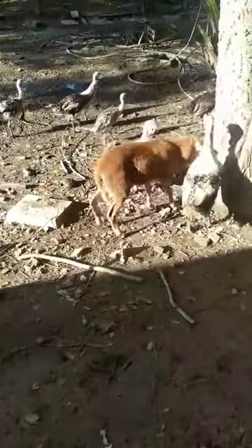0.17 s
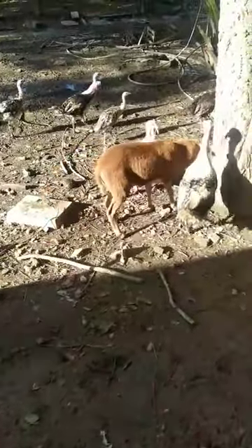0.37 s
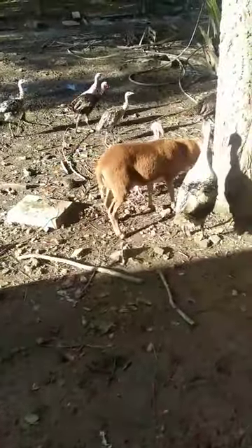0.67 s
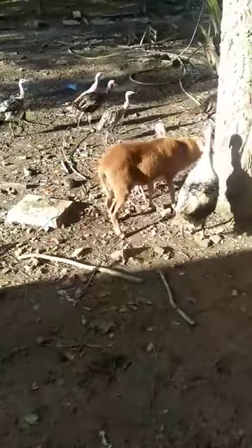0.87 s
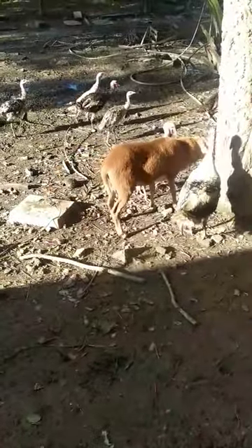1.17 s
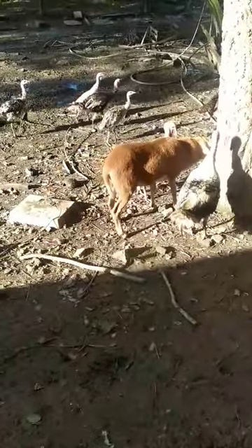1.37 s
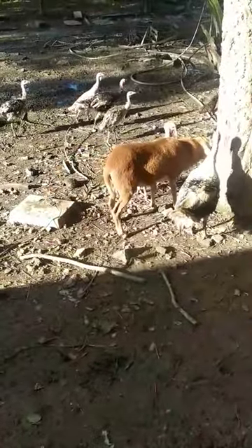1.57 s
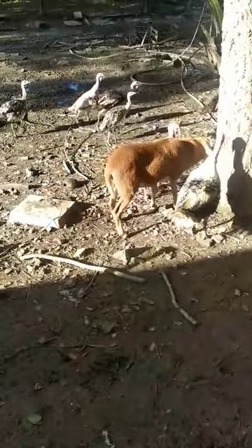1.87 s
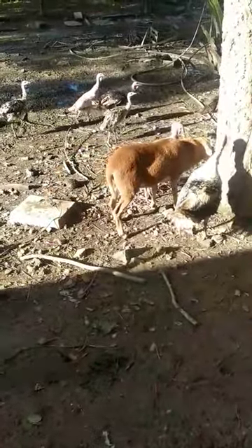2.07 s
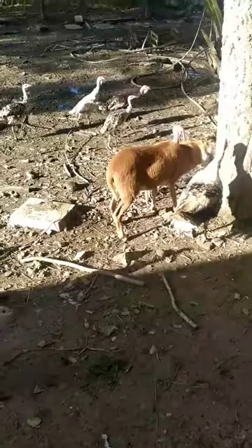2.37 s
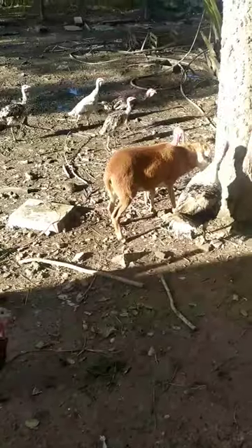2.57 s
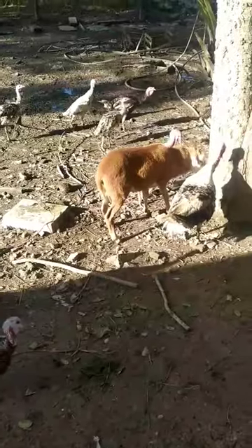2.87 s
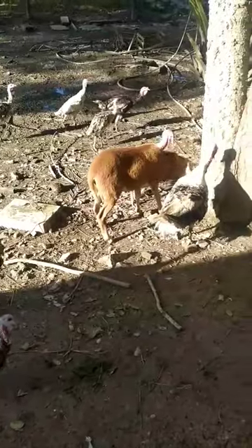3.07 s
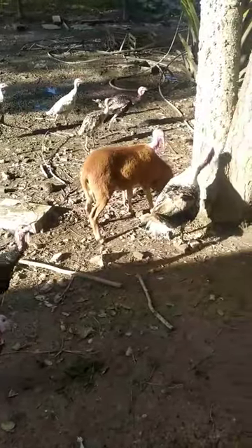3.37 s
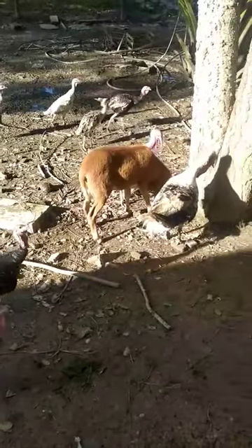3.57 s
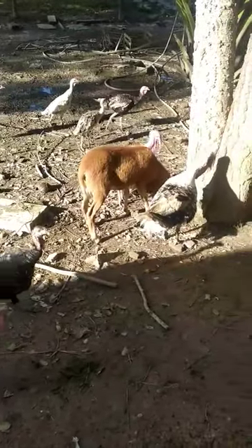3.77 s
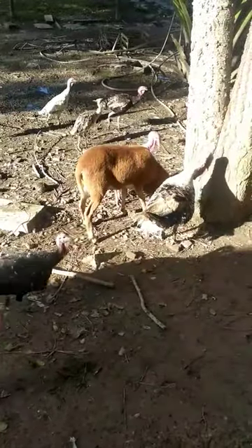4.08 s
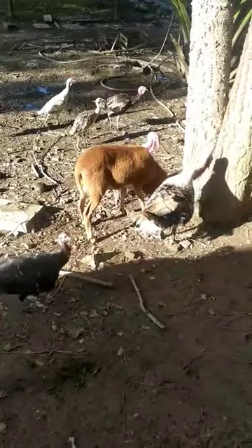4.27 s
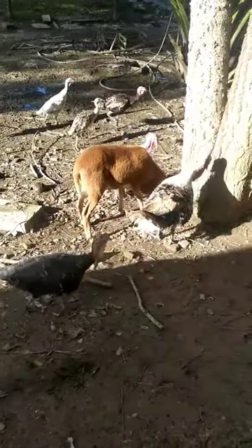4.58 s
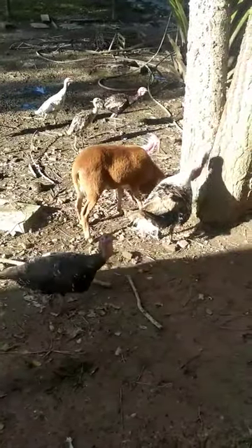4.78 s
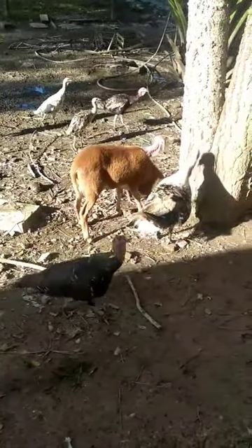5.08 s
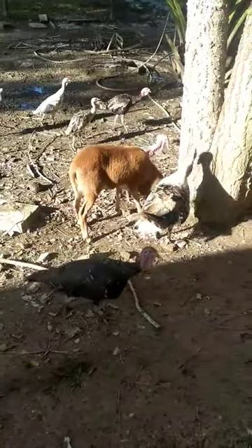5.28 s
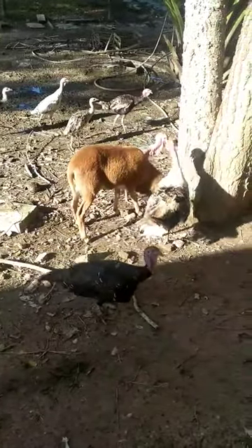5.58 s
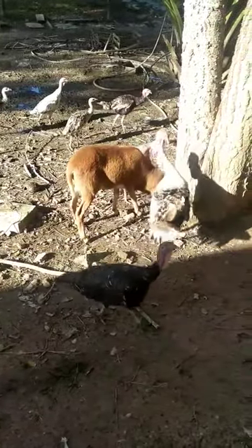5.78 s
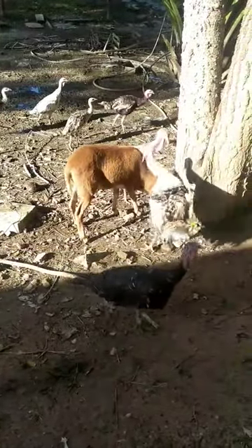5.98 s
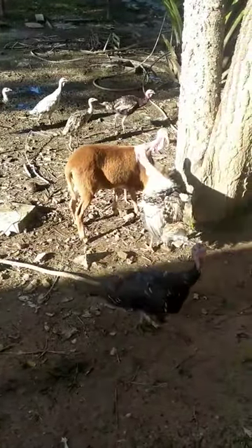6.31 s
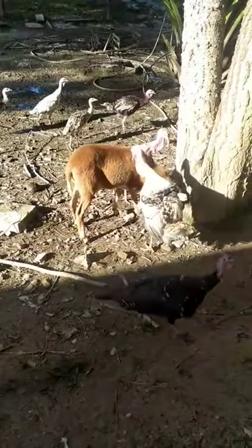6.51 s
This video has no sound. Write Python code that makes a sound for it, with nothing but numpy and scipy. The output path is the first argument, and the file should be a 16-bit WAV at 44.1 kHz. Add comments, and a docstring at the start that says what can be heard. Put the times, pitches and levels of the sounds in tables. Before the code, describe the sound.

Young turkeys give short, raspy, bent yelps and clucks in an open farmyard, with low wind buffeting, faint distant calls and one thin trill.

```python
"""Sharp yelps from nearby young turkeys come first, over a light wind and the hush of an open farmyard.
Each yelp is a quick gliding tone with a burst of raspy overtones; clucks and pips are shorter notes of the same kind.
Soft whistles, one thin trill and hoarse distant calls are wavering tones, some with breathy noise.
Dry litter crackles as shaped noise. Wind is low noise that buffets mostly the left port of the microphone."""
import sys
import numpy as np
from scipy import signal
from scipy.fft import rfft, irfft, next_fast_len
from scipy.io import wavfile
from scipy.ndimage import map_coordinates

SR = 44100
rng = np.random.default_rng(int(sys.argv[2]) if len(sys.argv) > 2 else 0)


def file_out(sig):
    """Save sig as 16-bit WAV at sys.argv[1]."""
    # one column per channel
    cols = np.atleast_2d(sig).T
    # limit, then scale
    lim = np.clip(cols, -1, 1)
    pcm = np.round(lim * 32767).astype(np.int16)
    wavfile.write(sys.argv[1], SR, pcm)


N = 293265

# Levels in the tables are starting levels, before balance between the ports, echo and other gains.
# Near yelps: start_s, length_s, pitch_hz, glide_octaves, level_db, rasp_db, left_lead_rad, left_over_right_db
YELPS = [(0, 0.017, 1120, -0.16, -39, -14, -1.27, 7.5), (0.086, 0.031, 946, 0.14, -36, -10.5, -0.45, 1.5),
         (0.222, 0.017, 1086, 0.42, -38.5, -3.5, 0.66, 17.5),
         (0.275, 0.022, 988, 0.71, -34.5, -14, -0.56, 10.5),
         (0.539, 0.031, 1010, 0.35, -48.5, -37, -0.63, 6),
         (0.576, 0.077, 912.4, -0.0067, -31, -21.5, -0.49, 6.5),
         (0.774, 0.04, 1002, 0.3, -31, -15, -1.4, 6), (0.85, 0.03, 954, 0.45, -30, -16, -0.26, 6),
         (1.333, 0.045, 910, -0.3, -35, -24, -0.73, 5), (1.381, 0.038, 950, 0.15, -36.5, -33.5, -1.3, 6),
         (1.53, 0.021, 1110, 0.52, -41.5, -18, -0.96, 7), (2.045, 0.021, 1010, 0.48, -51.5, -34, -0.84, 7),
         (2.218, 0.05, 834, 0.36, -50, -13, -0.74, 6), (2.903, 0.014, 948, -0.84, -40.5, -13, -0.17, 4.5),
         (3.547, 0.04, 898, -0.32, -48, -22, -0.019, 3), (3.577, 0.031, 678, 0.23, -42.5, -14.5, 0.6, 4),
         (3.602, 0.029, 912, 0.019, -43, -10, 0.031, 3), (3.869, 0.012, 887, 0.52, -36.5, -8, 0.54, 6),
         (3.934, 0.016, 728, 0.14, -33, -14, 0.099, 5), (4.159, 0.032, 688, 0.12, -37.5, -16, 0.36, 4),
         (4.259, 0.036, 1086, 0.35, -52, -3, -0.53, 7), (4.366, 0.019, 705, 0.25, -32.5, -12, 0.13, 4),
         (4.437, 0.018, 722, 0.23, -32, -13, 0.24, 5), (4.983, 0.027, 920, 0.7, -56, -10, -0.2, 7),
         (5.012, 0.05, 831, -0.0071, -42, -22, 0.47, 7.5), (5.158, 0.028, 850, 0.23, -43, -20, 0.71, 5),
         (5.263, 0.016, 884, 0.2, -36, -11, 0.39, 4), (5.332, 0.017, 835, 0.39, -39, -10, 0.24, 5),
         (5.61, 0.019, 714, 0.35, -44.5, -14, 0.55, 5), (5.658, 0.035, 871, -0.069, -45, -16.5, -0.28, -1),
         (5.759, 0.027, 914, 0.00026, -36, -18, -0.5, 2), (5.839, 0.024, 885, 0.16, -31.5, -22, -0.7, 5),
         (6.15, 0.024, 838, 0.34, -49, -32, 0.92, 10), (6.581, 0.034, 890, -0.36, -43, -22.5, 0.21, 6),
         (6.621, 0.037, 682, 0.56, -39, -17, 0.42, 3)]
# Clucks, low notes with an octave above: start_s, length_s, pitch_hz, level_db, octave_db, rasp_db
CLUCKS = [(0.165, 0.02, 682, -36.5, 6, -8), (0.332, 0.023, 672.5, -36.5, 6, -9),
          (0.919, 0.0138, 684.5, -34, 6, -13), (5.907, 0.0154, 686, -36.5, -8.5, -13)]
# Pips, tiny falling contact notes: start_s, pitch_hz, level_db
PIPS = [(1.596, 712, -54.5), (2.638, 1234, -52.5), (3.368, 768, -53.5), (3.908, 906, -51),
        (4.414, 907, -60), (5.38, 690, -49.5), (5.507, 750, -54)]
# Drawn-out whistles: start_s, length_s, pitch_hz, glide_octaves, level_db, huskiness_db
WHISTLES = [(1.411, 0.11, 896, -0.02, -46, -24), (2.26, 0.15, 899, 0.045, -56.5, -9),
            (2.662, 0.21, 858, -0.53, -61, -25), (3.131, 0.039, 801, 0.2, -45, -37),
            (3.196, 0.11, 897, 0.17, -59.5, -13), (3.642, 0.066, 899, -0.087, -49, -33),
            (3.734, 0.053, 1151, 0.21, -44.5, -12), (4.112, 0.03, 1110, 0.49, -51, -26),
            (4.265, 0.28, 1222, -0.28, -57, -23), (5.052, 0.06, 1209, 0.013, -51, -9),
            (5.199, 0.083, 1142, -0.055, -55.5, -16), (5.259, 0.19, 940, -0.0036, -47.5, -36),
            (5.683, 0.29, 946, 0.052, -58, -10), (6.166, 0.46, 1255, -0.014, -61, -31)]
# Distant calls: start_s, length_s, pitch_hz, glide_octaves, level_db, overtones_db, noise_share_0_to_1
FAR_CALLS = [(1.093, 0.33, 637, -0.025, -61, -20, .4), (1.586, 0.36, 590, -0.27, -65, -13, .4),
             (2.233, 0.43, 807, 0.03, -77.5, 12.5, 0.5), (2.66, 0.32, 799, -0.047, -64, 8, 0.68),
             (2.93, 0.28, 548, -.1, -58, 2.5, 0.94), (5.429, 0.18, 535, -0.108, -48, -10.5, 0.55),
             (5.882, 0.24, 538.7, -.12, -52, -7.5, 0.56), (6.15, 0.59, 611, 0.072, -67, -9, 0.1)]
# The course of the trill: time_s, pitch_hz, level_db, chirps_per_s
TRILL = [(2.22, 2870, -66.5, 52), (2.37, 3020, -60, 47), (2.52, 3003, -54, 49), (2.63, 2994, -53, 38),
         (2.72, 3046, -54.5, 44), (2.8, 3150, -53.5, 68), (2.84, 3255, -67, 42), (2.885, 3144, -41, 74),
         (2.91, 3014, -51, 59), (2.935, 3000, -72, 50)]
# Scratches in the dry litter: start_s, level_db, rise_s, fall_by_60_db_s
SCRATCHES = [(0.077, -44, 0.0022, 0.21), (0.146, -32, 0.015, 0.019), (0.167, -38.5, 0.0076, 0.43),
             (0.391, -49, 0.025, 0.23), (0.741, -37, 0.0049, 0.044), (0.753, -46, 0.0078, 0.13),
             (1.02, -52.5, 0.0042, 0.41), (2.839, -53, 0.041, 0.38), (3.597, -50.5, 0.013, 0.55),
             (3.762, -53.5, 0.018, 1)]
# Strength of the wind: time_s, buffet_db
WIND = [(0.0, -50), (1.15, -40), (1.52, -45.5), (1.57, -41.5), (1.67, -46), (1.85, -34), (1.97, -46),
        (2.26, -36), (2.35, -55.5), (2.44, -38.5), (4.36, -40), (4.64, -44.5), (5.86, -40), (6.65, -36)]
# Single gusts: start_s, peak_db
GUSTS = [(1.564, -23.5), (1.759, -24), (1.83, -29), (2.236, -28.5), (2.746, -20.5), (3.379, -25),
         (3.992, -30), (4.358, -25.5), (5.873, -22), (6.199, -23.5), (6.337, -27.5)]
# Strength of the yard's hush: time_s, hiss_db
HUSH = [(0.0, -53), (1.31, -59.5), (3.98, -56.5), (6.65, -57.5)]

# Colours of the noises, each later scaled to a set loudness: frequency_hz, level_db_per_hz
RUMBLE_COLOUR = [(13, -44), (22, -64), (44, 0), (70, 2.5), (177, -15.5), (362, -55.5), (420, -30),
                 (550, -49), (920, -120)]
EDDY_COLOUR = [(60, -5.5), (150, -3.5), (260, -12.5), (500, -37), (1200, -92)]
GUST_COLOUR = [(25, -40), (60, 1), (150, -6.5), (260, -17.5), (500, -63), (1200, -70)]
YARD_COLOUR = [(180, -46), (300, -2.5), (485, -6), (562, -2), (836, -4.5), (970, -7.5), (1310, -15.5),
               (1590, -17), (7920, -15.5), (15600, -25)]
LITTER_COLOUR = [(600, -5.5), (1500, 0.5), (4000, -9.5), (7000, 1), (10000, -6.5), (13500, -5.5),
                 (16000, -9)]
# How throats colour overtones and breath, near and far: frequency_hz, gain_db
THROAT = [(500, 14), (1100, 22), (1380, 18.5), (1650, 2), (2000, 18.5), (2500, 8), (3050, 18.5),
          (3500, 3.5), (3900, 11.5), (4700, 8), (5400, -3), (6300, 3), (9000, -2), (15000, -33)]
FAR_THROAT = [(500, 12), (900, 10), (1300, 4.5), (1700, 10.5), (2200, -2), (4000, -9)]
# How long the yard's echo lasts: frequency_hz, fall_by_60_db_s
ECHO = [(300, 0.98), (1000, 0.5), (3000, 0.85), (10000, 0.03)]

# A note opens fast, grows a little, closes just before its end and rings down
ATTACK_S, RELEASE_S, RING_S, CRESCENDO_DB = 0.0078, 0.0028, 0.0013, 1.5
SCOOP_OCT_PER_S = 3.27  # the longer a note, the deeper it sags in the middle
STRAIN_DB_PER_OCT = 12  # rasp rises with pitch within a note
RASP_AT_S, RASP_WIDTH_S = 0.015, 0.015  # the rasp is a burst soon after the start of a note
BREATHY = 0.4  # share of breath noise in the rasp's power
CRACKLE_HZ, CRACKLE_DB_PER_OCT = 4000, 10  # treble tilt of the rasp, by how far the note lies below 1000 Hz
# Nearby things scatter short waves most: the spray against the direct sound, for a note of 1000 Hz
NOTE_SCATTER_DB, RASP_SCATTER_DB, SCATTER_T60_S = -11, -0.5, 0.24
SCATTER_DB_PER_OCT = 2  # higher notes are scattered more
CLUCK_GLIDE_OCT, CLUCK_LEFT_DB, CLUCK_LEAD_RAD = 0.302, 4.5, -0.96  # every cluck jerks upward
PIP_S, PIP_GLIDE_OCT, PIP_RASP_DB = 0.014, -0.19, -17
GUST_RISE_S, GUST_T60_S = 0.0087, 0.12
GUST_RMS_DB = -7.5  # a gust's rms against its peak
FAR_ARCH_OCT = 0.0466  # a distant call rises in the middle
PEEP_FALL_S = 0.035  # a whistle drops in pitch as it ends
PEEP_DROP_OCT_PER_S2 = 3  # the drop grows with the square of the length
TRILL_MERGE_S = (2.69, 2.82)  # the chirps run together between these times
CHIRP_FALL = 0.036  # each separate chirp slides from this share above its pitch to this share below
UNDERTONE_HZ, UNDERTONE_DB = 1320, -5.5  # centre of the low pip between chirps, and its level against them
TOP_HZ = 15750  # nothing is kept from here up


def amp(db):
    """Decibels to gain."""
    return 10 ** (np.asarray(db) / 20)


def unit(x):
    """Scale to rms 1."""
    return x / np.sqrt(np.mean(x ** 2) + 1e-20)


def along(points, hz):
    """Read a table of (frequency, value) points on a log frequency axis."""
    f, v = np.transpose(points)
    return np.interp(np.log(hz + 1), np.log(f + 1), v)


def curves(rows):
    """One value per sample for each column after the time."""
    s, *cols = np.transpose(rows)
    return [np.interp(np.arange(N) / SR, s, c) for c in cols]


def wobble(rate, size=N):
    """A smooth random curve with rate knots a second."""
    return map_coordinates(rng.standard_normal(4096), [np.arange(size) * rate / SR], mode="wrap")


def filtered(x, response):
    """Change the strength of each frequency in x by a response."""
    size = x.shape[-1]
    m = next_fast_len(size + 8192)  # spare room so the end does not wrap onto the start
    return irfft(rfft(x, m) * response(np.fft.rfftfreq(m, 1 / SR)), m)[..., :size]


def noise(colour, size=N):
    """Two unrelated noises of the given colour, scaled together to rms 1."""
    return unit(filtered(rng.standard_normal((2, size)), lambda hz: amp(along(colour, hz))))


def balance(left_db):
    """Left and right gains, left_db apart."""
    return amp([[left_db / 2], [-left_db / 2]])


def ports(pair, alike, left_db):
    """Mix two unrelated signals into left and right with a given likeness and balance."""
    turn = np.arccos(np.clip(alike, -1, 1)) / 2
    mid, side = np.cos(turn) * pair[0], np.sin(turn) * pair[1]
    return np.array([mid + side, mid - side]) * balance(left_db)


def add(track, s, x):
    """Mix x into track at time s, dropping what falls outside."""
    start = round(s * SR)
    x = x[..., max(-start, 0):max(N - start, 0)]
    track[..., max(start, 0):max(start, 0) + x.shape[-1]] += x


def cycle(hz):
    """Running phase of a pitch curve, in radians."""
    return 2 * np.pi * np.cumsum(hz) / SR


def bend(u, hz, glide, scoop):
    """Pitch of a note, u from 0 to 1: a glide through hz with both ends lifted by scoop, in octaves."""
    return hz * 2 ** (glide * (u - .5) + scoop * (2 * u - 1) ** 2)


def overtones(hz, throat, count, lead=0):
    """Harmonics 2 to count at both ports, coloured by the throat; each has its own strength and flickers."""
    k = np.arange(2, count + 1)[:, None]
    flicker = np.array([wobble(120, len(hz)) for _ in k])
    uneven_db = 3 * rng.standard_normal(k.shape) + 3 * flicker
    gain = amp(along(throat, k * hz) + uneven_db)
    phase = k * cycle(hz) + rng.uniform(0, 2 * np.pi, k.shape)
    return unit(np.array([np.sum(gain * np.sin(phase + side * k * lead / 2), 0) for side in (1, -1)]))


def scatter(x, db):
    """Ground, trunk and bodies close by send each port a dense, short spray of copies."""
    t = np.arange(SR // 8) / SR
    spray = rng.standard_normal((2, len(t))) * amp(-60 * t / SCATTER_T60_S)
    spray *= amp(db) / np.linalg.norm(spray[0])
    spray[:, 0] = 1  # the direct sound
    return signal.fftconvolve(x, spray, axes=1)


def call(length, pitch_hz, glide, db, rasp_db, lead, left_db, octave=0, flutter_db=1.17, jitter=0.027):
    """The syrinx (voice organ) sounds a short bent note; under strain its membranes slap and add overtones."""
    t = np.arange(int((length + 3 * RING_S) * SR)) / SR  # room for the ring-down
    size, u = len(t), np.minimum(t / length, 1)
    hz = bend(u, pitch_hz, glide, SCOOP_OCT_PER_S * length)
    burst = 1 / (1 + ((t - RASP_AT_S) / RASP_WIDTH_S) ** 2)
    strain = amp(STRAIN_DB_PER_OCT * np.log2(hz / pitch_hz)) * burst
    hz = hz * (1 + jitter * wobble(471.0, size))

    attack = np.sin(np.pi / 2 * np.minimum(t / ATTACK_S, 1))
    ring_down = np.exp(-np.maximum(t - length + RELEASE_S, 0) / RING_S)
    effort = attack * ring_down * amp(CRESCENDO_DB * u + flutter_db * wobble(240, size))

    phase = cycle(hz) + np.array([[lead / 2], [-lead / 2]])
    note = unit(effort * (np.sin(phase) + octave * np.sin(2 * phase)))
    note_scatter_db = NOTE_SCATTER_DB + SCATTER_DB_PER_OCT * np.log2(pitch_hz / 1000)
    tone = scatter(note, note_scatter_db) * balance(left_db)

    # breath noise pulses with the note
    air = noise(THROAT, size=8192)[:, :size] * (1 + .6 * np.sin(cycle(hz)))
    buzz = overtones(hz, THROAT, count=13, lead=lead)
    rasp = unit(effort * strain * (np.sqrt(1 - BREATHY) * buzz + np.sqrt(BREATHY) * air))
    # the lower a note, the harder and drier its crackle
    crackle_db = CRACKLE_DB_PER_OCT * np.log2(1000 / pitch_hz)
    rasp = filtered(rasp, lambda f: amp(crackle_db * f ** 4 / (f ** 4 + CRACKLE_HZ ** 4)))
    rasp = scatter(rasp, RASP_SCATTER_DB - crackle_db) * balance(left_db=1.0)
    return amp(db) * np.sqrt(size / SR / length) * (tone + amp(rasp_db) * rasp)


def yelps():
    """The near birds yelp: short bent notes, each with its own rasp and place."""
    out = np.zeros((2, N))
    for s, *note in YELPS:
        add(out, s, call(*note))
    return out


def wind():
    """Eddies hit the ports; stronger wind throws smaller, higher eddies too, and single gusts thump."""
    db, = curves(WIND)
    lumps = amp(3.75 * np.array([wobble(35), wobble(35)]))
    buffet = amp(db + 3.0) * unit(lumps * noise(RUMBLE_COLOUR))
    eddies = amp(db - 15.5 + 5.6 * wobble(40)) * noise(EDDY_COLOUR)
    # each gust slaps the port and dies away
    t = np.arange(SR // 4) / SR
    slap = np.minimum(t / GUST_RISE_S, 1) * amp(-60 * np.maximum(t - GUST_RISE_S, 0) / GUST_T60_S)
    for s, gust_db in GUSTS:
        add(eddies, s, amp(gust_db + GUST_RMS_DB) * slap * noise(GUST_COLOUR, size=len(t)))
    return ports(buffet, alike=0, left_db=8.5) + ports(eddies, alike=0.75, left_db=14.5)


def yard(rustle_db=-11):
    """The steady hush of the open yard is soft noise, with the faint, uneven rustle of many feet."""
    db, = curves(HUSH)
    hush = amp(db - 0.03) * amp(0.46 * wobble(5)) * ports(noise(YARD_COLOUR), alike=0.11, left_db=0.0)
    shuffle = amp(3.5 * wobble(12) + 5 * wobble(300))
    return hush + amp(db + rustle_db) * shuffle * noise(LITTER_COLOUR)


def flock(yelp_db, count):
    """The rest of the flock answers the near birds with faint, pure-toned yelps of its own."""
    out = np.zeros((2, N))
    for row in rng.integers(len(YELPS), size=count):
        s, length, hz, glide = YELPS[row][:4]
        u = np.linspace(0, 1, int(length * SR))
        own_hz = bend(u, hz, glide, 0) * rng.lognormal(0, 0.099)
        note = np.sin(np.pi * u) * np.sin(cycle(own_hz))
        place = amp(rng.normal(0, 2)) * balance(rng.normal(4, 4))
        add(out, s + rng.uniform(0, 0.16), amp(yelp_db) * place * note)
    return out


def scratches():
    """Dry leaves and grit: a quick swell of rough noise, then a crackling decay."""
    out, t = np.zeros((2, N)), np.arange(SR // 2) / SR
    for s, db, rise, t60 in SCRATCHES:
        grit = unit(noise(LITTER_COLOUR, size=len(t)) * amp(0.27 * wobble(1100, len(t))))
        shape = np.minimum(t / rise, 1) ** 2 * amp(-60 * np.maximum(t - rise, 0) / t60)
        add(out, s, amp(db) * shape * ports(grit, alike=0.39, left_db=2.0))
    return out


def clucks():
    """Low, shaky near notes that jerk upward, with a second tone one octave above."""
    out = np.zeros((2, N))
    for s, length, hz, db, octave_db, rasp_db in CLUCKS:
        cluck = call(length, hz, CLUCK_GLIDE_OCT, db, rasp_db, CLUCK_LEAD_RAD, CLUCK_LEFT_DB,
                     octave=amp(octave_db), jitter=0.056)
        add(out, s, cluck)
    return out


def far_fowl():
    """Hoarse calls from across the yard: a wavering tone plus overtones mixed with noise."""
    out = np.zeros((2, N))
    for s, length, pitch_hz, glide, db, bright_db, hoarse in FAR_CALLS:
        size = int(length * SR)
        u = np.linspace(0, 1, size)
        waver = .013 * wobble(200, size) + .011 * wobble(30, size)
        hz = bend(u, pitch_hz, glide, -FAR_ARCH_OCT) * (1 + waver)
        clear = np.sqrt(1 - hoarse) * overtones(hz, FAR_THROAT, count=3)
        upper = clear + np.sqrt(hoarse) * noise(FAR_THROAT, size)
        voice = np.sin(cycle(hz)) + amp(bright_db) * upper
        loudness = amp(db + 2.5 * wobble(90, size)) * np.sin(np.pi * u)
        add(out, s, loudness * voice * balance(left_db=5.5))
    return out


def swell(u, crest):
    """Effort of a note: it rises to the crest and falls back to nothing."""
    return np.sin(np.pi * np.interp(u, [0, crest, 1], [0, .5, 1])).clip(0)


def whistles(quaver_db=2.0):
    """Quavering peeps from birds farther back; a raised voice is shakier, a long note sinks as it ends."""
    out = np.zeros((2, N))
    for s, length, pitch_hz, glide, db, husk_db in WHISTLES:
        size = int(length * SR)
        u = np.linspace(0, 1, size)
        drop = PEEP_DROP_OCT_PER_S2 * length ** 2 * np.exp((u - 1) * length / PEEP_FALL_S)
        shakiness = np.interp(db, [-52, -44], [.011, .02])
        shake = shakiness * wobble(170, size) + .008 * wobble(18, size)
        hz = bend(u, pitch_hz, glide, 0) * 2 ** -drop * (1 + shake)
        husk = .4 * overtones(hz, THROAT, count=4) + .9 * noise(THROAT, size=size)
        voice = np.sin(cycle(hz)) + amp(husk_db) * husk
        loudness = amp(db + quaver_db * wobble(66.6, size)) * np.sqrt(swell(u, crest=.9))
        add(out, s, loudness * voice)
    return out * balance(left_db=10.5)


def pips():
    """The near birds' contact notes: tiny falling tones with little rasp."""
    out = np.zeros((2, N))
    for s, hz, db in PIPS:
        add(out, s, call(PIP_S, hz, PIP_GLIDE_OCT, db, PIP_RASP_DB, lead=0, left_db=7))
    return out


def gate(rows, fade):
    """Opens softly at the first row's time and shuts softly at the last."""
    t = np.arange(N) / SR
    return np.clip(np.minimum(t - rows[0][0], rows[-1][0] - t) / fade, 0, 1)


def trill(sizzle_db=-17):
    """Falling chirps alternate with low pips, then run together; a faint sizzle of noise rides above."""
    hz, db, rate = curves(TRILL)
    apart = np.interp(np.arange(N) / SR, TRILL_MERGE_S, [1, .25])  # how separate the chirps are
    beat = cycle(rate * (1 + .26 * wobble(55))) / (2 * np.pi) % 1  # 0 to 1 within each chirp
    chirp = np.sin(np.pi * beat) ** 2
    waver = .014 * wobble(70) + .022 * wobble(600)
    phase = cycle(hz * (1 + apart * CHIRP_FALL * (1 - 2 * beat) + waver))
    sizzle = noise([(9900, -40), (10350, 10), (10600, 0), (11000, -40)])
    high = np.sin(phase) * balance(left_db=7.5) + amp(sizzle_db) * sizzle
    high *= 1 + apart * (1.8 * chirp - 1)

    low_tone = np.sin(cycle(UNDERTONE_HZ * (1 + .03 * wobble(60))))
    low = amp(UNDERTONE_DB + 4 * wobble(40)) * (apart * (1 - chirp)) ** 2 * low_tone
    loudness = gate(TRILL, fade=.02) * amp(db + 1 + 2.5 * apart * wobble(60))
    chirps = loudness * (high + low * balance(left_db=7.5))
    return scatter(chirps, db=-12)[:, :N]


def echo(x, damping_hz=5000):
    """Trunks and sheds scatter the sound into a noisy tail; each frequency dies at its own speed."""
    hz, t, z = signal.stft(rng.standard_normal((2, SR // 2)), SR, nperseg=256)
    tail = signal.istft(z * amp(-60 * t / along(ECHO, hz)[:, None]), SR, nperseg=256)[1]
    early_boost = 1 + 2.6 * np.exp(-np.arange(tail.shape[1]) / SR / 0.035)
    tail = ports(tail * early_boost, alike=0.47, left_db=-4.0)
    # a short gap of 1/300 s comes before the tail
    tail = np.pad(tail / np.linalg.norm(tail[0]), ((0, 0), (SR // 300, 0)))
    wet = signal.fftconvolve(x, tail, axes=1)[:, :N]
    return filtered(wet, lambda f: 1 / np.sqrt(1 + (f / damping_hz) ** 2))


def scene():
    """Near birds are mostly dry; far ones carry more of the yard's echo."""
    near = yelps() + clucks() + pips() + trill()
    back = whistles()
    far = far_fowl() + flock(yelp_db=-55.5, count=70)
    wet = echo(amp(-13) * near + amp(-3) * back + amp(-4) * far)
    return near + back + far + wet + scratches() + wind() + yard()


def record(dry, low_cut_hz=37):
    """The microphone sheds the deepest rumble and keeps nothing above its band limit."""
    return filtered(dry, lambda hz: (hz < TOP_HZ) * hz ** 4 / np.hypot(hz ** 4, low_cut_hz ** 4))


dry = scene()
out = record(dry)
file_out(out)
```